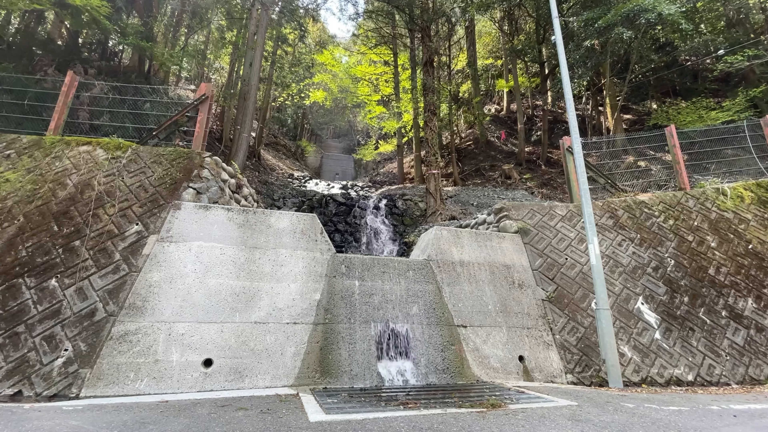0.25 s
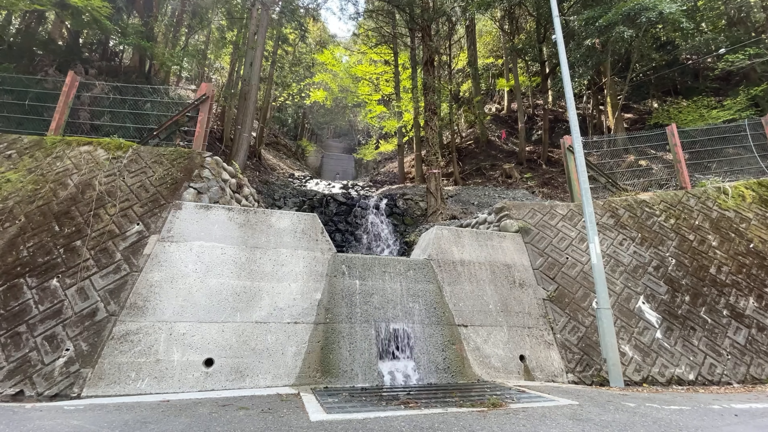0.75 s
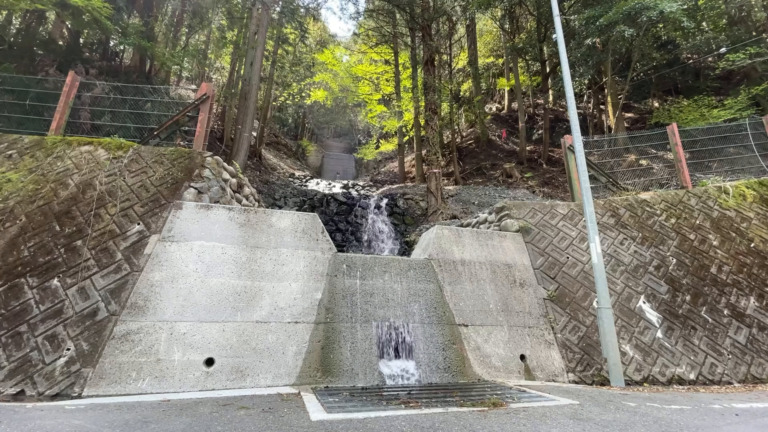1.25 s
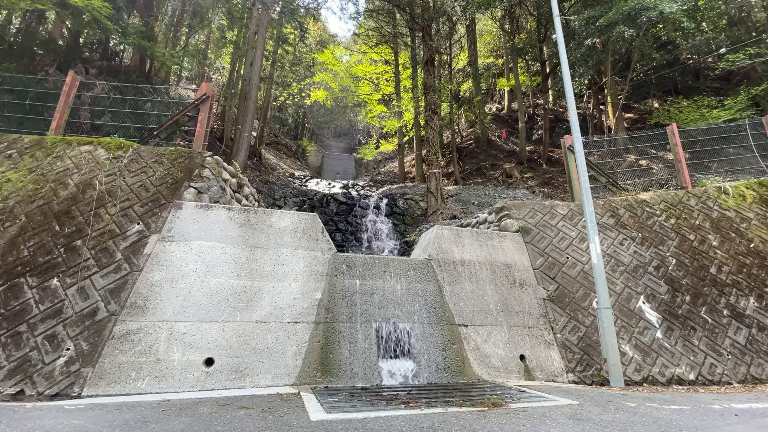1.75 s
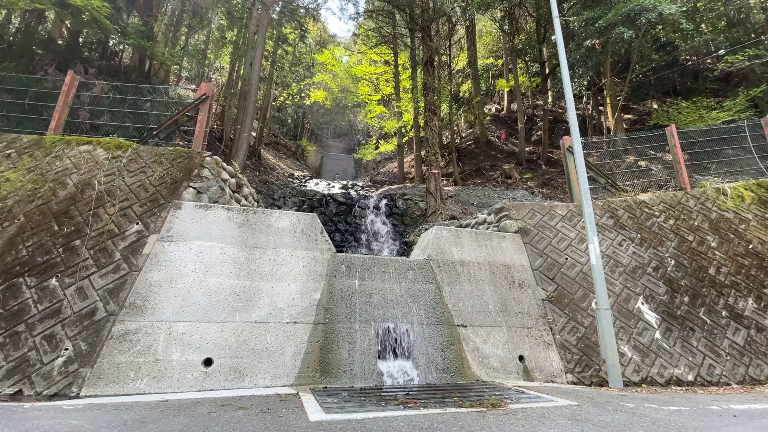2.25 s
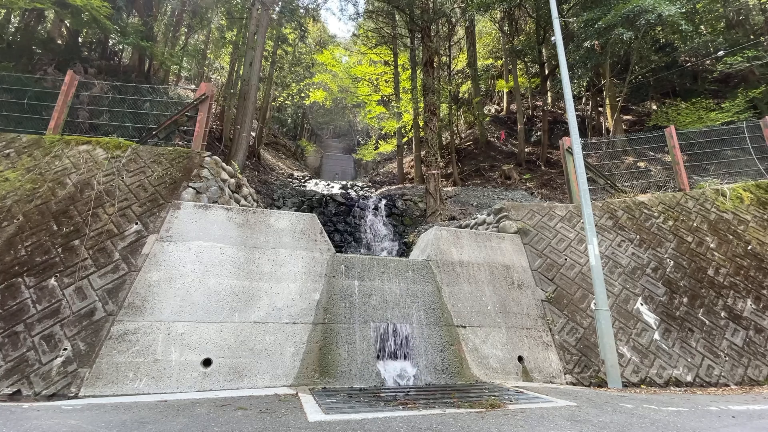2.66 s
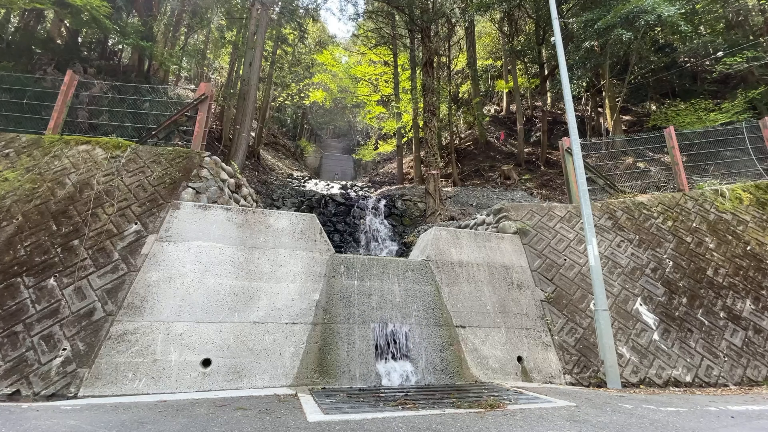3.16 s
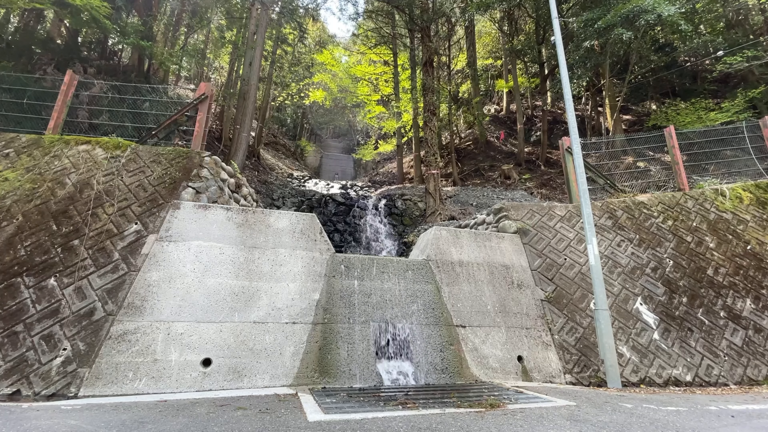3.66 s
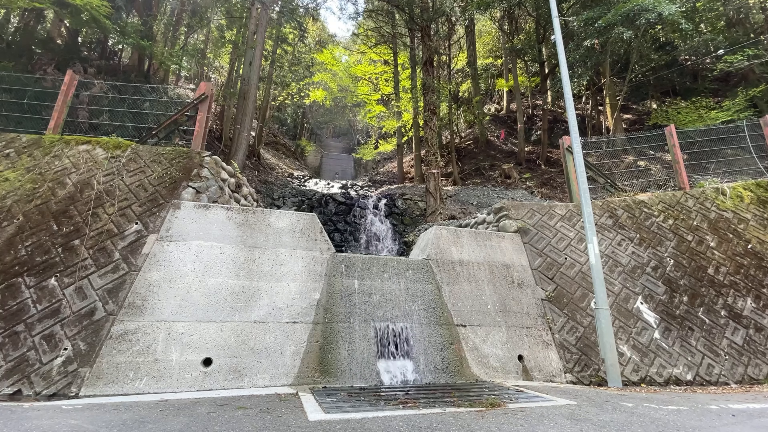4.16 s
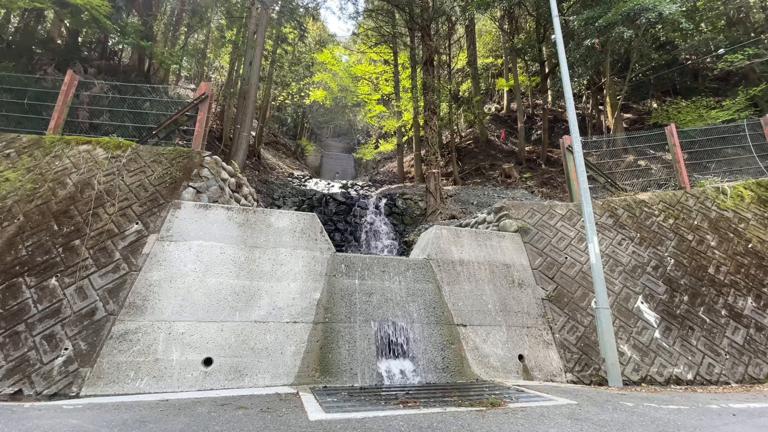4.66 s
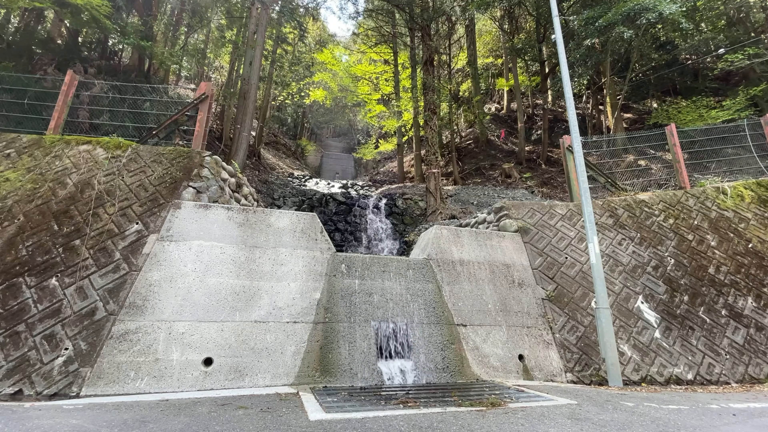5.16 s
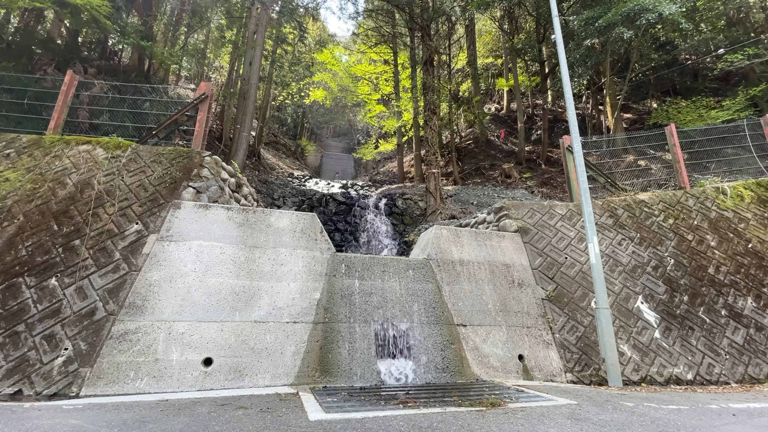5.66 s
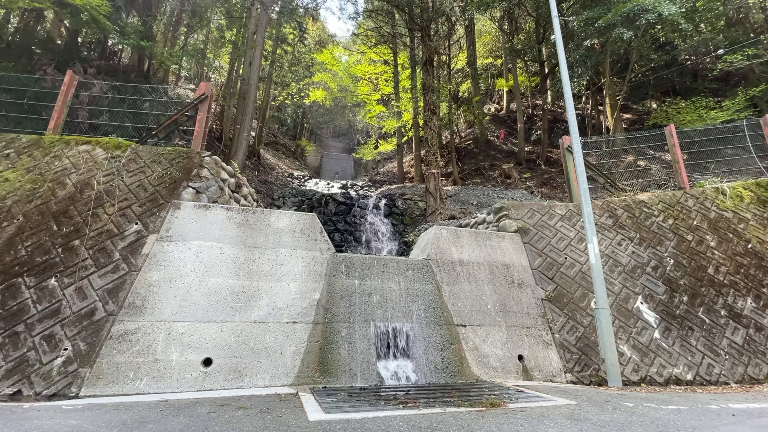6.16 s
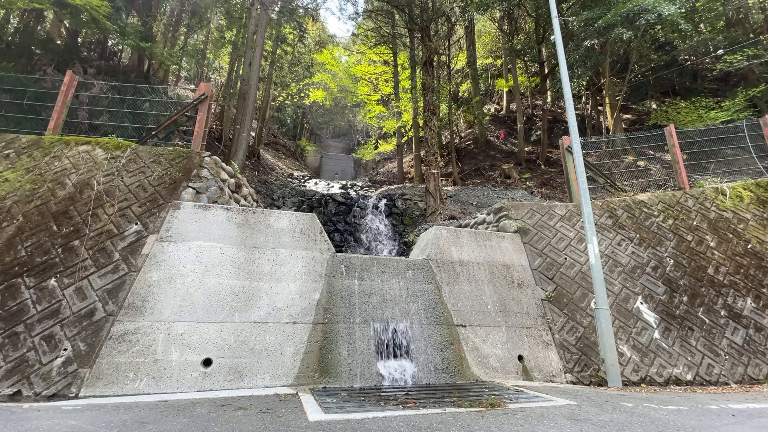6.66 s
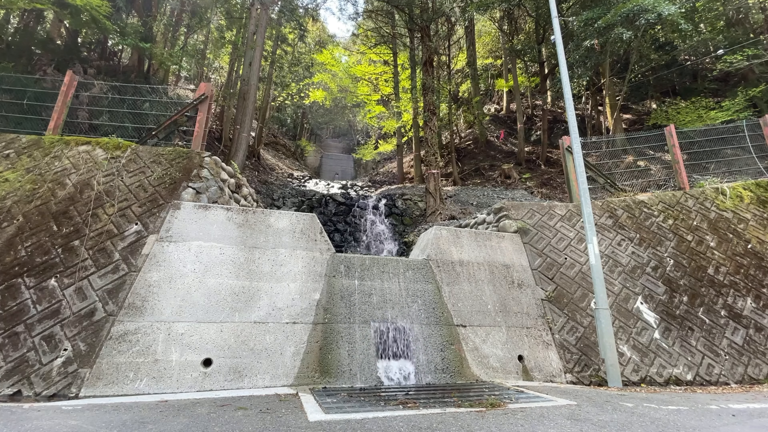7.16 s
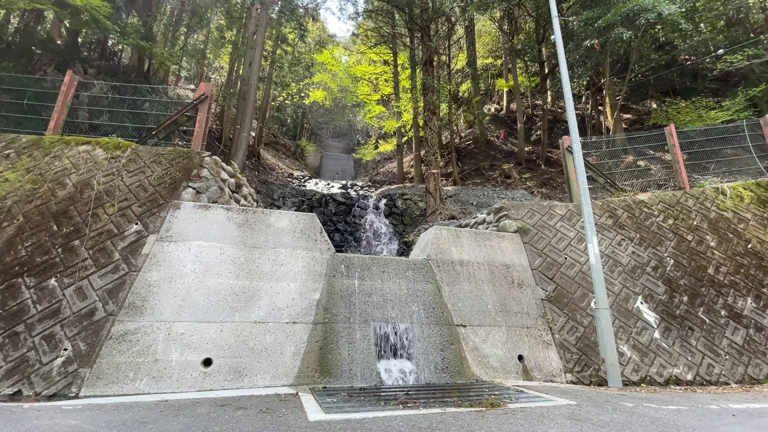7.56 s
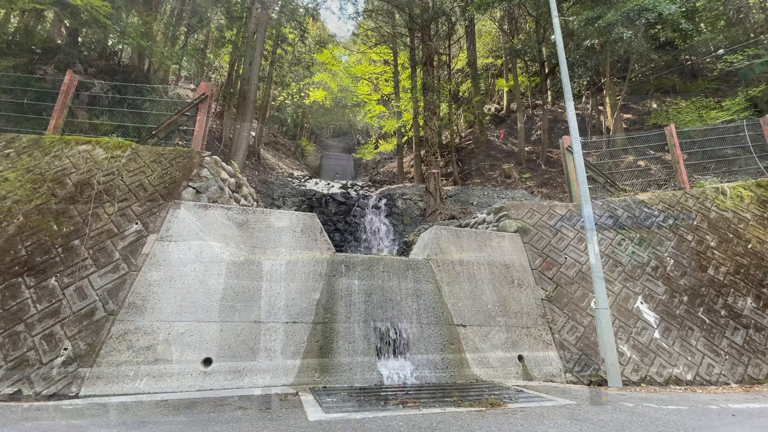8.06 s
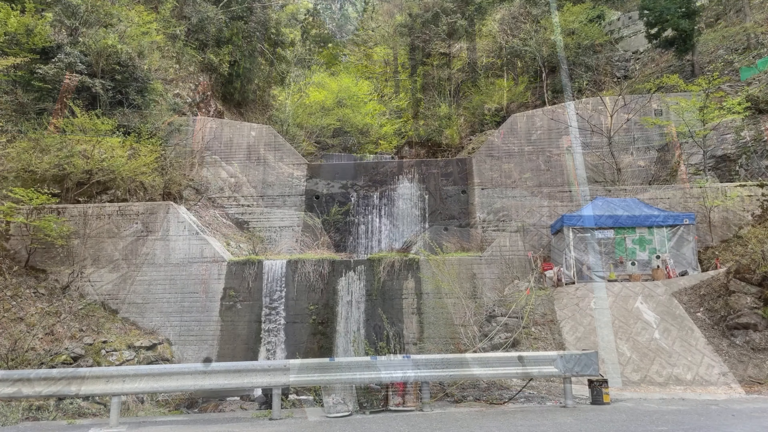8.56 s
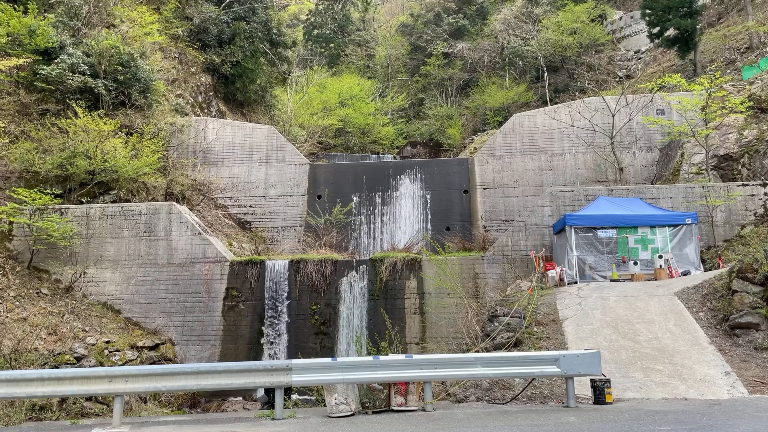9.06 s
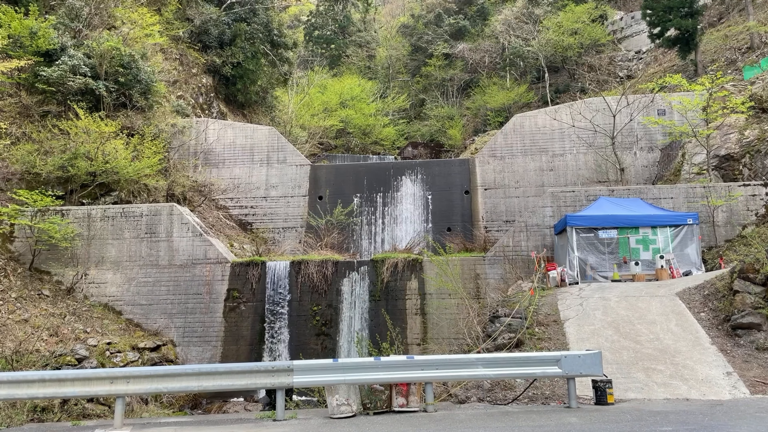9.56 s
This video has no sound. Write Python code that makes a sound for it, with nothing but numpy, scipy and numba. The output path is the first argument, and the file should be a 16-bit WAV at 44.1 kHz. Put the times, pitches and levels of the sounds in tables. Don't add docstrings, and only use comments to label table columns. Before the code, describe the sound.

Outdoors by a roadside, water pours down a small concrete weir a few metres away, bright, dense and steady, with a slow single-cylinder engine thudding underneath. After about eight seconds it cuts abruptly through a tiny silence to a larger stepped dam farther off, softer and duller, with low wind buffeting the stereo phone microphone and one small hard tick close by.

```python
import sys
import numpy as np
from scipy import signal
from scipy.fft import rfft, irfft
from scipy.io import wavfile
from scipy.ndimage import uniform_filter1d
from numba import njit

SR = 44100
rng = np.random.default_rng(int(sys.argv[2]) if len(sys.argv) > 2 else 0)


def gain_from_db(level_db):
    decades = np.asarray(level_db, float) / 20
    return 10 ** decades


def master(y):
    cut = np.clip(np.atleast_2d(y).T, -1, 1)
    pcm = np.round(cut * 32767)
    wavfile.write(sys.argv[1], SR, pcm.astype(np.int16))


N = 433062

TIME = np.arange(N) / SR
FREQ = np.fft.rfftfreq(N, 1 / SR)
CUT_S, BACK_S = 8.2778, 8.2995


def walk(rate_hz):
    k = int(SR / rate_hz)
    held = np.repeat(rng.standard_normal(N // k + 1), k)
    slewed = uniform_filter1d(uniform_filter1d(held, k), k)[:N]
    return slewed / slewed.std()


def decay(t, t60_s):
    return np.exp(-np.log(1000) * t / t60_s)


def port_gain(level_db, pan_db):
    return gain_from_db(level_db + np.array([[.5], [-.5]]) * pan_db)


@njit
def ring(start, hz, cycles, glide, size):
    out = np.zeros(N)
    for k in range(len(start)):
        n = int(cycles * SR / hz[k]) + 2
        turn = np.exp(2j * np.pi * hz[k] / SR - 4.6 / n)
        rise = np.exp(2j * np.pi * hz[k] / SR * glide / n)
        z = size[k] + 0j
        for i in range(start[k], min(start[k] + n, N)):
            out[i] += z.imag
            z *= turn
            turn *= rise
    return out


def flat(x):
    spectrum = rfft(x)
    power = uniform_filter1d(abs(spectrum) ** 2, size=1500)
    return spectrum * np.sqrt(N * SR / 2 / (power + 1e-9))


def bubbles(lo_hz, hi_hz, per_s, cycles, glide, scatter_db, share):
    when, pitch, luck = rng.random((int(per_s * N / SR), 3)).T
    size = gain_from_db(scatter_db * np.minimum(-np.log(1 - luck), 2))
    start = (when * N).astype(np.int64)
    hz = lo_hz * (hi_hz / lo_hz) ** pitch
    cloud = ring(start, hz, 1. * cycles, 1. * glide, size)
    rush = rng.standard_normal(N)
    share = np.clip(share, 0, 1)
    return np.sqrt(share) * flat(cloud) + np.sqrt(1 - share) * flat(rush)


def ports(first, second, table):
    hz, left_db, right_db, same, quarter = np.transpose(table)
    at, log_hz = np.log(FREQ + 1), np.log(hz)
    left = gain_from_db(np.interp(at, log_hz, left_db))
    right = gain_from_db(np.interp(at, log_hz, right_db))
    like = np.interp(at, log_hz, same) + 1j * np.interp(at, log_hz, quarter)
    like = like / np.maximum(abs(like), 1)
    other = np.sqrt(np.maximum(1 - abs(like) ** 2, 0))
    rise = np.clip(.5 + 8 * (at - log_hz[0]), 0, 1)
    fall = np.clip(.5 + 8 * (log_hz[-1] - at), 0, 1)
    edge = np.sin(np.pi / 2 * rise) * np.sin(np.pi / 2 * fall)
    return irfft(edge * np.array([left * first, right * (like * first + other * second)]), N)


def falling_water(roar, splash, spray, surge_db, patchy_db):
    surge = surge_db * (.4 * walk(9) + 1.3 * walk(25) + 1.2 * walk(55))
    deep = [bubbles(62.0, 896, per_s=900, cycles=10.0, glide=0.24, scatter_db=3.5, share=0.19) for _ in "ab"]
    mid = [bubbles(719, 5990, per_s=5000, cycles=15.2, glide=0.18, scatter_db=3.0, share=0.39) for _ in "ab"]
    fine = [bubbles(4530, 15900, per_s=7000, cycles=18, glide=0.13, scatter_db=4.0, share=0.52) for _ in "ab"]
    roar_sound = ports(*deep, roar) * gain_from_db(patchy_db * walk(11))
    splash_sound = ports(*mid, splash) * gain_from_db(0.39 * surge + patchy_db * walk(30))
    spray_sound = ports(*fine, spray) * gain_from_db(surge + patchy_db * walk(66))
    return roar_sound + splash_sound + spray_sound


def near_weir():
    # pitch_hz, left_db_per_hz, right_db_per_hz,
    # likeness_in_phase, likeness_quarter_cycle
    near_roar = [(35, -87, -85, 0.87, 0.0), (50, -68, -66, 0.93, -0.01), (70, -69, -72, 1, -0.11),
                 (109, -69, -68, 0.78, 0.03), (149, -64, -66, 0.98, -0.13), (200, -66, -66.5, 0.87, -0.05),
                 (270, -65, -68, 0.66, 0.01), (304, -62.5, -65, 0.77, 0.07),
                 (329, -63.5, -66.5, 0.43, 0.03), (360, -64, -67.5, 1, 0.12),
                 (380, -67.5, -67, 0.39, 0.082), (527, -67.5, -71.5, 0.31, 0.11),
                 (640, -66.5, -68, 0.037, -0.21), (808, -66.5, -69, 0.83, -0.04)]
    near_splash = [(821, -66, -67, 0.56, -0.4), (1037, -64, -67, 0.9, -0.39),
                   (1094, -68, -68.5, 0.7, -0.09), (1236, -63, -68, 0.87, 0.068),
                   (1544, -67, -67.5, 0.62, 0.16), (1726, -62.5, -64.5, 0.85, -0.16),
                   (2050, -65, -69, 0.7, 0.17), (2440, -63.5, -62, 0.83, -0.067),
                   (2727, -66, -68.5, 0.69, -0.96), (3370, -72, -74, 0.1, -0.22),
                   (3600, -72.5, -73.5, 0.35, 0.048), (4230, -74, -73.5, 0.72, -0.12),
                   (4800, -70, -73, 0.46, -0.7), (5460, -72.5, -73.5, 0.38, -0.19)]
    near_spray = [(5490, -71.5, -72.5, 0.46, -0.19), (6230, -70.5, -77, -0.05, -0.05),
                  (6570, -70.5, -70, 0.41, 0.017), (7130, -70.5, -75, 0.68, 0.67),
                  (7600, -69.5, -81.5, 0.09, 0.0022), (8240, -78, -74, 0.11, -0.3),
                  (9100, -73.5, -72, -0.69, -0.06), (9630, -81, -74.5, 0.1, -0.32),
                  (10400, -83, -79, 0.26, -0.4), (11100, -83.5, -81.5, 1, -0.02),
                  (12200, -83, -84, 0.95, 0.0), (13500, -85.5, -85, -0.17, 0.45),
                  (13950, -85.5, -85.0, -0.91, 0.07), (15600, -83.5, -86, -1.0, 0.0)]
    return falling_water(near_roar, near_splash, near_spray, surge_db=0.27, patchy_db=0.21)


def engine():
    # start_s, firings_per_s
    idle = [(0.0, 11.577), (0.945, 12.107), (1.012, 11.759), (1.995, 11.794), (2.467, 11.278),
            (3.194, 11.621), (3.848, 11.818), (4.18, 11.404), (4.902, 12.235), (5.332, 11.915),
            (5.36, 11.448), (6.237, 11.616), (7.612, 12.063), (7.922, 11.384), (8.28, 11.248)]
    # start_hz, end_hz, glide_s, swell_s, level_db
    thud_tones = [
        (187, 43.7, .0138, .012, 1.4),
        (301.6, 54, .0188, .009, -15),
    ]
    # pitch_hz, level_db (re thud), t60_s
    pipe = (296, -37.5, 0.22)
    level_db, scatter_db, pan_db, lag_s = -12.5, .6, .7, .0009
    start_s, firings_per_s = np.transpose(idle)
    turns = .0703 + np.cumsum(np.interp(TIME, start_s, firings_per_s)) / SR
    fired = np.flatnonzero(np.diff(np.floor(turns), prepend=-1))
    kicks = np.zeros(N)
    kicks[fired] = gain_from_db(scatter_db * rng.standard_normal(len(fired)))

    t = TIME[:SR // 8]
    pipe_hz, pipe_db, pipe_t60_s = pipe
    thud = gain_from_db(pipe_db) * np.sin(2 * np.pi * pipe_hz * t) * decay(t, pipe_t60_s) * (1 - np.exp(-t / .008))
    for top_hz, low_hz, glide_s, swell_s, db in thud_tones:
        cycles = low_hz * t + (top_hz - low_hz) * glide_s * (1 - np.exp(-t / glide_s))
        envelope = (t / swell_s) ** 2 * np.exp(-2 * t / swell_s)
        thud = thud + gain_from_db(db) * envelope * np.sin(2 * np.pi * cycles)
    left = signal.fftconvolve(kicks, thud)[:N]
    right = np.interp(TIME - lag_s, TIME, left)
    return np.array([left, right]) * port_gain(level_db, pan_db)


def restart_step():
    return -gain_from_db(-31) * np.exp(-np.maximum(TIME - BACK_S, 0) / .0008)


def far_dam():
    # pitch_hz, left_db_per_hz, right_db_per_hz,
    # likeness_in_phase, likeness_quarter_cycle
    far_roar = [(35, -75, -70.8, -0.36, 0.49), (70, -65, -64, -0.26, 0.084), (150, -66, -66.5, 0.31, -0.15),
                (252, -64, -64.5, 0.99, -0.0078), (405, -71.5, -71.5, 0.4, -0.48),
                (640, -69, -74, -0.3, -0.71), (780, -69, -78, 0.35, -0.32)]
    far_splash = [(800, -69.5, -70.5, 0.27, -0.36), (1000, -70, -76, 0.34, -0.44),
                  (1130, -73, -74, 0.15, -0.43), (1300, -72.5, -82, 0.11, -0.27),
                  (1580, -74.5, -72, 0.086, -0.17), (1850, -75, -81.5, -0.05, -0.14),
                  (2100, -73.5, -73, 0.58, 0.09), (2400, -74, -76.5, 0.49, -0.29),
                  (2800, -81.5, -75.5, 0.11, -0.36), (3200, -78.5, -91, 0.12, -0.04),
                  (3600, -82.5, -80.5, 0.46, -0.23), (4050, -82, -82.1, 0.51, -0.22),
                  (4800, -83.5, -80, -0.13, -0.41), (5470, -83.3, -88, -0.38, -0.3)]
    far_spray = [(5500, -81, -87, -0.38, -0.31), (6100, -86.5, -84.5, -0.13, 0.11),
                 (6600, -85, -88, 0.46, 0.25), (7100, -87.0, -92, 0.35, 0.25),
                 (7700, -89, -92.1, -0.35, -0.12), (8400, -89.5, -96, -0.59, -0.07),
                 (9100, -92.6, -92.4, -0.53, -0.37), (9700, -93.3, -91, 0.01, -0.59),
                 (10400, -95, -93, 0.31, -0.55), (11100, -97, -95.7, 0.95, -0.03),
                 (12300, -99, -99, 0.99, 0.01), (13600, -99.3, -99.4, -0.39, 0.32),
                 (13950, -99.5, -99.5, -1.0, 0.0), (15600, -98.9, -98.9, -1.0, 0.0)]
    return falling_water(far_roar, far_splash, far_spray, surge_db=.4, patchy_db=.5)


def port_noise(lo_hz, hi_hz):
    band = signal.butter(3, [lo_hz, hi_hz], "band", fs=SR, output="sos")
    return signal.sosfilt(band, rng.standard_normal((2, N)))


def wind():
    # peak_s, level_db, length_s, pan_db (left minus right)
    gust_list = [(8.366, -40, .04, 2), (8.48, -45, .04, -6), (8.587, -39.5, 0.031, 10),
                 (8.7, -40, 0.072, 1), (8.853, -46, .05, 0), (8.97, -50, .02, 8), (9.07, -44, .02, -9),
                 (9.137, -48, 0.023, 1), (9.285, -45, .025, -5), (9.43, -48, .07, 2), (9.53, -48, .03, -5),
                 (9.69, -45, 0.044, 0), (9.785, -49, .025, 3)]
    calm_db = -64
    swirl = port_noise(45, 127)
    flutter = port_noise(125, 320)
    swirl = swirl / np.sqrt(uniform_filter1d(swirl ** 2, size=1800) + 0.089 * swirl.var())
    buffet = swirl + gain_from_db(-11.5) * flutter / flutter.std()
    strength = gain_from_db(calm_db)
    for peak_s, db, length_s, pan_db in gust_list:
        strength = strength + port_gain(db, pan_db) * np.exp(-((TIME - peak_s) / length_s) ** 2)
    return buffet * gain_from_db(3.5) * strength


def eddy_strikes():
    # peak_s, pitch_hz, level_db, length_s, pan_db (left minus right)
    eddy_list = [
        (8.384, 55, -30, 0.015, -2),
        (8.608, 80, -35, .016, 4),
        (9.065, 75, -38, 0.011, -5),
        (9.289, 70, -35, .018, -5),
    ]
    out = np.zeros((2, N))
    for peak_s, hz, db, length_s, pan_db in eddy_list:
        t = TIME - peak_s
        out += port_gain(db, pan_db) * np.cos(2 * np.pi * hz * t) * np.exp(-(t / length_s) ** 2)
    return out


def tick():
    # pitch_hz, level_db, t60_s
    tick_modes = [(2500, 1.5, .0058), (2270, -20, .02), (4800, -16, .004), (7000, -24, .003)]
    t = np.maximum(TIME - 8.6827, 0)
    hit = sum(gain_from_db(db) * np.sin(2 * np.pi * hz * t) * decay(t, t60_s) for hz, db, t60_s in tick_modes)
    hit = hit * (1 - np.exp(-t / .0012))
    echo = gain_from_db(-12) * np.roll(hit, int(.009 * SR))
    return port_gain(-7.5, pan_db=.6) * (hit + echo)


def scene():
    near = near_weir() + engine()
    far = restart_step() + far_dam() + wind() + eddy_strikes() + tick()
    return near * (TIME < CUT_S) + far * (TIME > BACK_S)


def low_pass(x):
    return signal.sosfilt(signal.butter(12, 15750, fs=SR, output="sos"), x)


def record(dry):
    bass_cut = signal.butter(2, 24, "high", fs=SR, output="sos")
    mix = signal.sosfiltfilt(bass_cut, dry, padtype="even")
    return low_pass(mix)


dry = scene()
out = record(dry)
master(out)
```